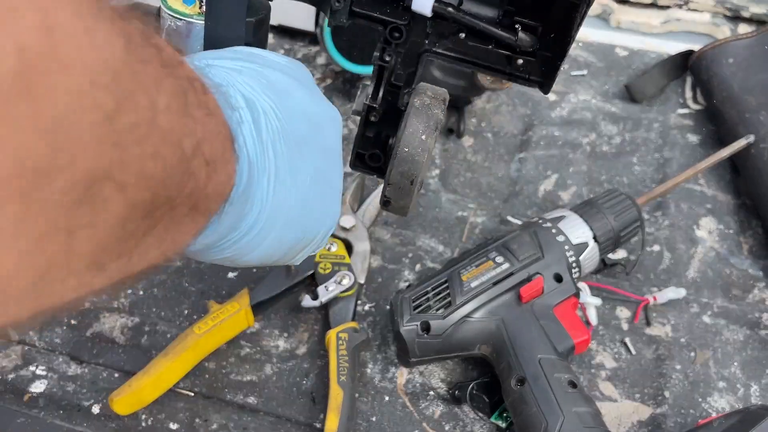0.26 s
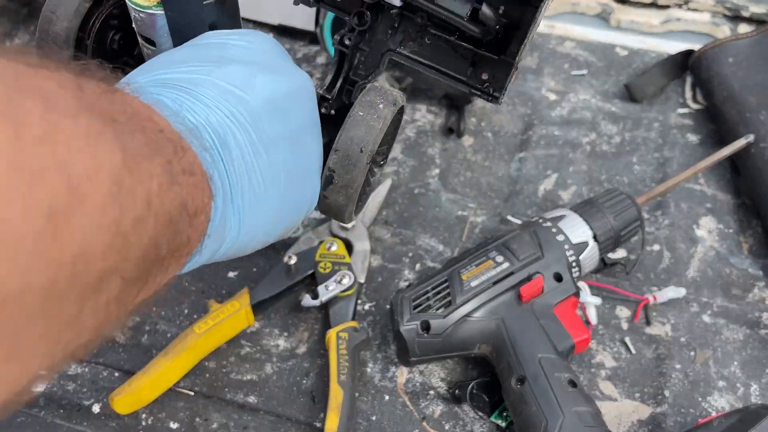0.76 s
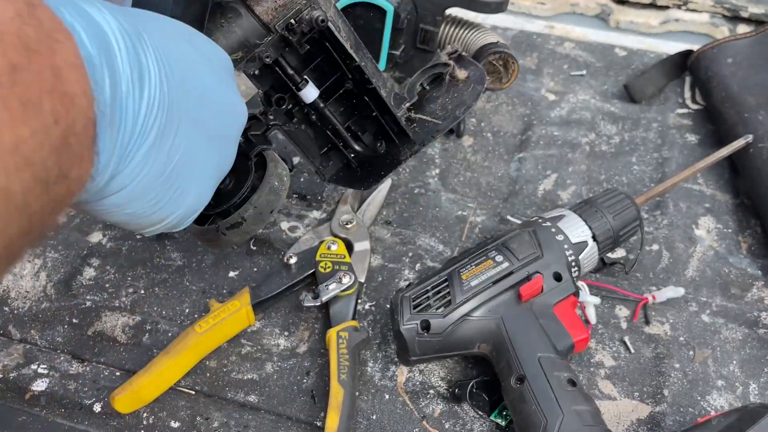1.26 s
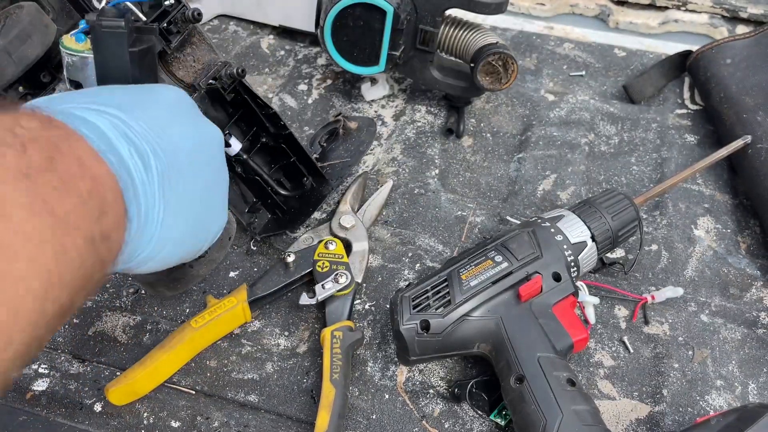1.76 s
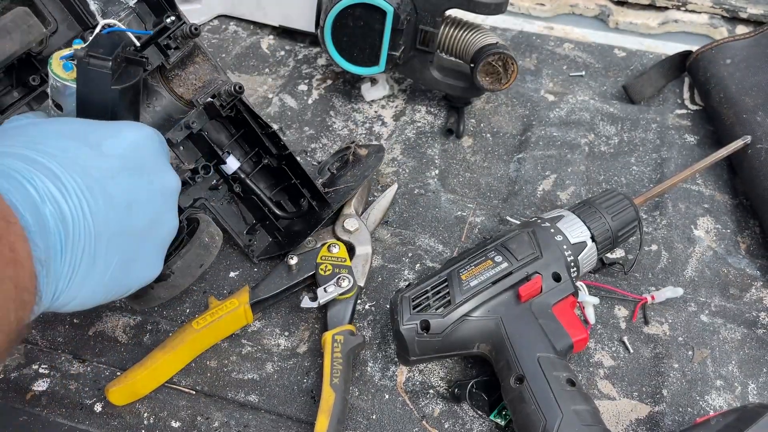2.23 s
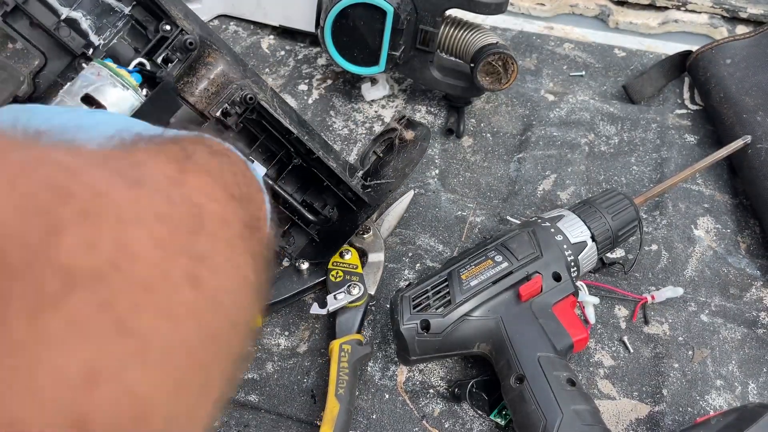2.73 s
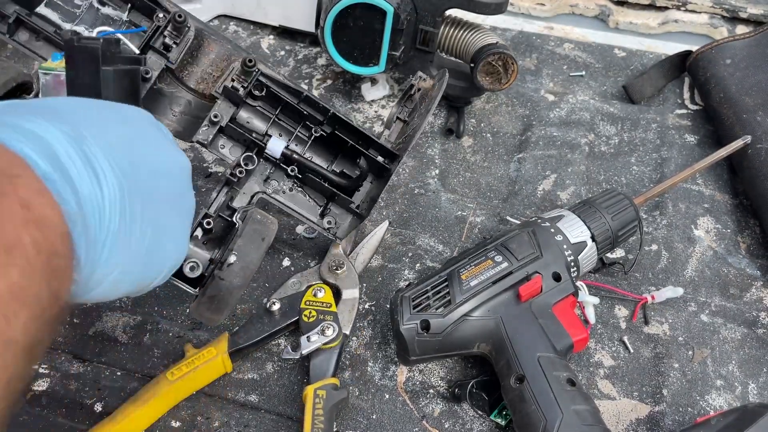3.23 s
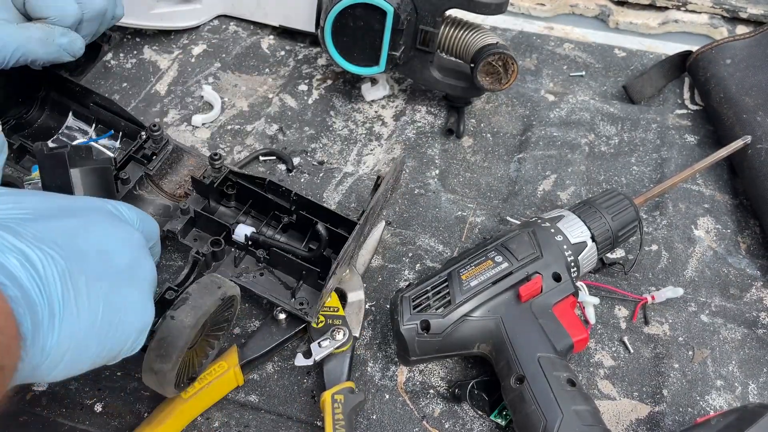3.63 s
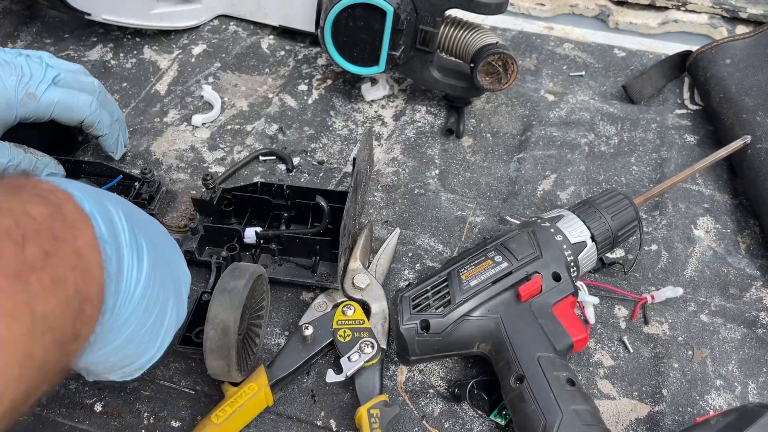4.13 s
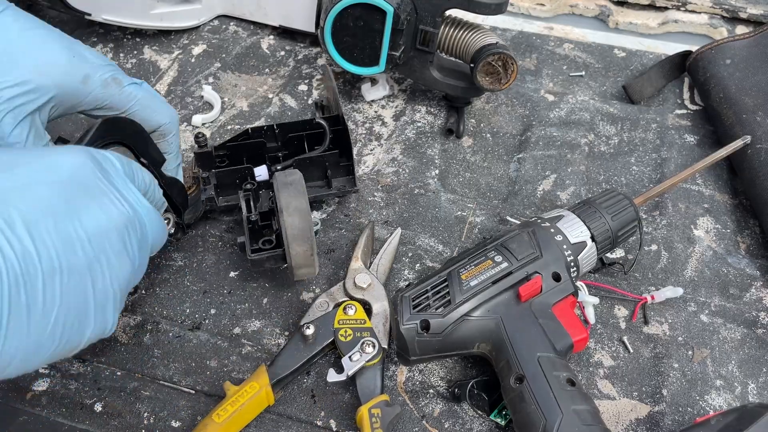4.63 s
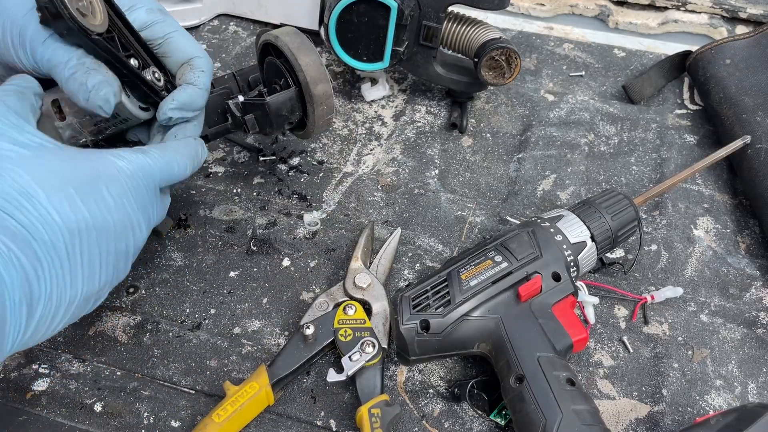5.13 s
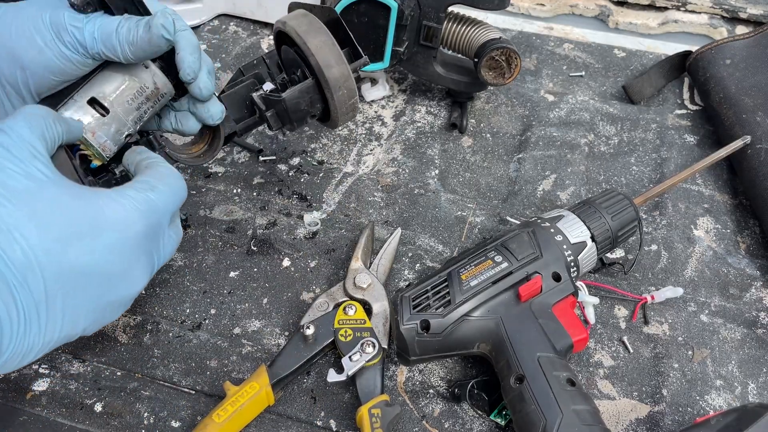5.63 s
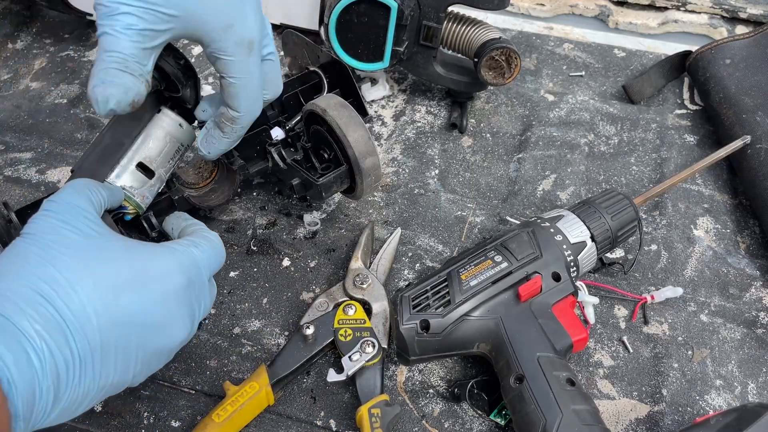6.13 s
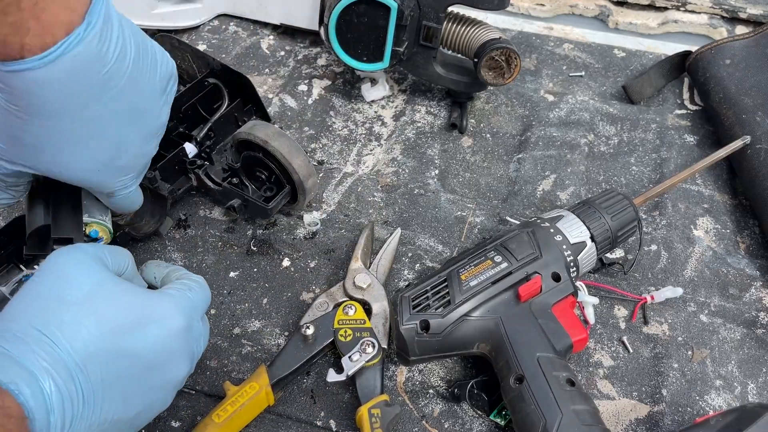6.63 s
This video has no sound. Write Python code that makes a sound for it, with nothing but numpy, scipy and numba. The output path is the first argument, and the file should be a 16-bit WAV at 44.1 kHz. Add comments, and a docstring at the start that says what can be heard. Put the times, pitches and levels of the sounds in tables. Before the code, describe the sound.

Close stereo, small garage with short, faint reflections; a low, wavering machine hum and dull rumble run throughout. Soft rubber-glove hiss with gritty ticks starts at once. At 0.2-0.27 s a tight burst of bright plastic cracks rings the hollow shell briefly, followed by weak snaps near 0.46 s and sparse clicks. From 1.1 s cracks mix with blunt bench bumps; a very bright snap lands at 1.7 s with a short groaning scrape. After a quieter gap, cracks return at 2.4-2.7 s, heavy low thuds and a drag hit near 2.8 s, and a dense cracking cluster peaks around 3.05 s. Loose pieces tick until 3.3 s. Softer knocks and scrapes follow, with small hollow creaks at 4.6 and 5.4 s. Thin clicks and a bright crack come around 5.7 s, a duller one at 5.87 s. From 6.3 s scrapes crowd in, with loud sharp snaps at 6.5 s, then fading knocks and drags.

```python
"""Gloved hands pry apart the hard plastic housing of a small appliance, close to the microphones, over a low hum.
Gloves hiss from the start as shaped noise with grit ticks; an early run of cracks rings the shell's decaying modes.
From about 1.1 s more cracks come with blunt bumps and drags on the bench, low-mode blows and stick-slip trains.
Loose pieces tap mostly just past 3 s, sliding sines creak from 4.6 s, and cracks and drags crowd in after 6.3 s.
Short noise echoes answer as a small garage; sine lines and rumble make the machine hum throughout."""
import sys
import numpy as np
from scipy import signal
from scipy.fft import rfft, irfft, next_fast_len
from scipy.io import wavfile
from scipy.ndimage import uniform_filter1d
from numba import njit

SR = 44100
rng = np.random.default_rng(int(sys.argv[2]) if len(sys.argv) > 2 else 0)


def master(y):
    """Save y as 16-bit WAV."""
    cut = np.clip(np.atleast_2d(y).T, -1, 1)
    pcm = np.round(cut * 32767)  # scale
    wavfile.write(sys.argv[1], SR, pcm.astype(np.int16))


N = 303055
TIME = np.arange(N) / SR
SIZE = next_fast_len(N, True)
FREQS = np.arange(SIZE // 2 + 1) * SR / SIZE + 1  # 1 Hz up, so that the log of the lowest bin exists

# cracks of ribs and catches: start_s, level_db, treble_db, part_hz (resonance of the part),
# rebounds (rounded to a whole count)
CRACKS = [(0.194, -6.5, -4.5, 3100, 0), (0.2034, -9, -33.5, 2880, 1), (0.2142, -9.5, -20.5, 1630, 2),
          (0.247, -11.5, -19, 3200, 0), (0.268, -4.5, -12.5, 4350, -0.5), (0.4571, -28.5, -60, 2120, 0),
          (0.476, -23, -36, 2140, 0), (1.1193, -6, -18, 3100, 2.6), (1.1435, -17, -34, 3180, 2.5),
          (1.3558, -14.5, -15.5, 3060, 0), (1.4262, -21, -7, 940, 0.5), (1.71, -5.5, -3.5, 8550, 0.062),
          (1.7704, -16.5, -26, 2000, 0.13), (1.8021, -18.5, -26, 2960, 2.2), (1.845, -23, -17, 3078, 0.35),
          (1.9012, -17.5, -29.5, 1040, 0), (2.4373, -23.5, -22, 3100, 0), (2.489, -27, -7, 2120, 2.4),
          (2.5198, -4.5, -13.5, 1560, 0), (2.6131, -28, -20, 960, 1.2), (2.724, -13.5, -17.5, 910, 3.1),
          (2.9379, -10, -18, 2502, 0), (2.9943, -15, -22.5, 990, 1.3), (3.057, -6.5, -17.5, 1550, 1),
          (3.074, -9, -20, 3000, 0.17), (3.0803, -5, -13.5, 2830, 0), (3.0856, -6, -14.5, 3180, 2),
          (3.4296, -11.5, -20.5, 960.7, 0), (3.4644, -17.5, -19.5, 1710, 0), (3.8182, -22, -33.5, 1223, 0),
          (4.5946, -20.5, -41, 1171, 3.8), (4.846, -17.5, -13.5, 1130, 2), (4.987, -25, -58, 1089, 1),
          (5.41, -28, -9, 1220, 0), (5.6967, -18.5, 4, 2700, 0), (5.8686, -10.5, -24, 1390, 0),
          (6.361, -27.5, -51, 1100, 0), (6.442, -22, -17, 3000, 0.5), (6.4723, -16, -15, 1082, 0.5),
          (6.488, -5.5, -8.5, 4900, -0.5), (6.504, -8, -11.5, 4570, 0.4), (6.5605, -22, -20, 1900, 1.35),
          (6.6439, -25.5, -46, 2140, 3)]
# a freed edge springs back and strikes again, ever later, weaker and duller than the first crack
REBOUND_S, REBOUND_GROWTH, REBOUND_DB, REBOUND_FADE_DB_PER_S, REBOUND_DULL_DB = .008, 1.6, -4.5, 276.5, -4.5
# bigger parts ring lower and shake more of the shell: body at 1 kHz, and its change with pitch
BODY_DB, BODY_DB_PER_OCTAVE = 2, -4.5
# spectrum of a crack before its own tilt and resonance: freq_hz, level_db_per_hz
CRACK_COLOUR = [(60, -9), (200, 3), (700, 1), (1500, -1), (3000, -4), (4600, -1), (6200, -6), (8700, -6.5),
                (10300, -21), (11800, -14), (16000, -49.5)]
# main modes of the housing as it lies on the bench: mode_hz, level_db (over the small modes), t60_s
HOUSING_MODES = [(132, 6, 0.13), (198.1, 8, 0.2), (343, -8.5, 0.51), (438.7, -0.5, 0.16),
                 (519.4, 8.5, 0.091), (630, 1.5, 0.1), (800, -3, 0.14), (1110, 1, 0.13), (1422, 4.5, 0.05),
                 (3005, -4, 0.14), (4310, -3.5, 0.057), (4880, -16.5, 0.075)]

# thin, bright clicks of small clips: start_s, level_db (before trim)
CLIP_CLICKS = [(0.052, -25), (0.573, -28.5), (0.771, -38.5), (0.8106, -34), (1.112, -26), (3.5875, -28),
               (4.718, -32.5), (5.511, -27.5), (5.6485, -24), (5.6633, -24), (5.739, -21.5), (5.772, -33),
               (5.805, -24), (6.2628, -36), (6.455, -25.5), (6.583, -33), (6.8538, -30)]
CLICK_HZ, CLICK_TREBLE_DB = 8670, -6

# bumps of the housing on the bench: start_s, level_db (before trim), peak_hz (loudest resonance),
# hardness_db (of the contact), rocking_s (time it goes on rocking)
BENCH_BUMPS = [(1.118, -8.5, 653, 8, 0), (1.363, -8, 139, -42, 0), (1.383, -11.5, 257, -5, 0.0011),
               (1.4257, -13.5, 452, -8, 0), (1.452, -27, 156, -34, 0.0011), (1.769, -14.5, 240, -13, 0.058),
               (1.901, -24, 230, -23, 0.0054), (2.796, -5.5, 190, -13.5, 0), (2.812, -6, 140.1, -12.5, 0),
               (2.883, -15, 133, -49, 0.14), (3.431, -18, 240, 4, 0.0078), (3.821, -17, 198.3, -27, 0),
               (3.862, -21.5, 230, -13, 0.002), (4.053, -15.5, 204, -12, 0), (4.46, -17, 342, -8, 0.0089),
               (4.569, -18.5, 217.1, -7.5, 0.021), (4.988, -18.5, 500, -10.5, 0.00075),
               (5.249, -28, 263, -2, 0.0094), (5.869, -15.5, 345.8, -9, 0.0093),
               (5.882, -17, 868.5, -10, 0), (6.399, -21, 398, -10, 0.00029), (6.421, -17, 390.2, -9, 0.038),
               (6.703, -19, 710, 4.5, 0), (6.717, -24, 304, -1.5, 0)]
ROCK_GAP_S, ROCK_LOSS_DB = .048, -1  # longest gap between rocking knocks; change from knock to knock
# band that a blunt contact excites: multiple of peak_hz, level_db_per_hz
THUD_BAND = [(.3, -18), (.6, -2), (1, 5), (2.2, -7), (4, -18.5), (12, -61)]
# sharp part of a bump before hardness is added: freq_hz, level_db_per_hz
CLACK = [(100, -44.5), (1200, -6.5), (4000, -15.0), (9000, -13.5), (16000, -52.5)]

# housing drags over the bench: start_s, length_s, groan_db, groan_hz, rasp_db, rasp_hz,
# pressure_change_db (start to end); both levels are before trim
DRAGS = [(1.627, .05, -35, 202.3, -52, 2017, -2.5), (1.72, 0.15, -24.5, 323, -37, 2765, -4.5),
         (2.691, 0.03, -42, 537, -36.5, 1725, 25), (2.783, 0.047, -21.5, 445, -44.5, 1999, -10),
         (2.883, 0.04, -26.5, 460, -58.5, 1702, -21), (3.462, 0.095, -38, 450.3, -75, 1712, -22),
         (3.955, 0.071, -36.5, 520, -48, 1500, -2), (4.08, 0.11, -46, 330, -63.5, 1520, 4),
         (4.485, 0.21, -36.5, 376.2, -43.5, 1600, 4.5), (4.678, 0.12, -40, 476, -48, 1810, -7),
         (5.017, .125, -36, 500, -47.5, 1190, -7), (5.137, 0.23, -43, 350.8, -63, 980, -2),
         (6.317, .08, -33.5, 330, -52, 1299, 12), (6.402, 0.082, -25, 445, -32, 1030, 3),
         (6.487, 0.044, -32, 335, -34, 1600, -1), (6.566, 0.066, -51, 400, -38.5, 1920, -16),
         (6.65, 0.06, -47, 402.5, -40.5, 2000, 12), (6.721, 0.13, -42.5, 350, -54, 1517, -12)]
# band that a drag excites: multiple of its resonance (widened for the rasp), level_db_per_hz
SCRAPE_BAND = [(.08, -26.5), (.45, -4), (1, 1), (1.6, -8.5), (3, -30.5), (12, -37)]

# hollow creaks of the shell under the fingers: start_s, length_s, level_db, start_hz, end_hz
SHELL_CREAKS = [(4.603, 0.097, -35, 340.6, 306), (4.689, 0.082, -39.5, 478, 552),
                (5.437, 0.11, -43, 392, 405)]

# moves of the gloves over the shell: start_s, length_s, level_db (mid-move)
GLOVE_MOVES = [(0, 0.57, -67.5), (1.07, 0.14, -47.5), (1.266, 0.14, -50), (1.42, 0.41, -51.5),
               (2.108, 0.51, -60), (2.897, 0.3, -61), (3.27, 0.47, -58), (3.797, 0.09, -53),
               (4.024, 0.13, -50), (4.19, 0.26, -59), (4.414, 0.23, -51.5), (4.638, 0.31, -48.5),
               (5.035, 0.093, -52), (5.177, 0.15, -54), (5.401, 0.15, -54), (5.636, 0.37, -53),
               (6.2, 0.52, -56)]
MOVE_ENDS_DB, GRIP_DB = -6, -72.5  # how much fainter a move is at its ends; rustle of a still grip
# hiss of glove on shell: freq_hz, level_db_per_hz
GLOVE_COLOUR = [(800, -3), (2500, -9), (4800, -7.5), (8800, -2), (10300, -18), (11500, -14.5),
                (14000, -41.5)]

# loose pieces tapping the shell: start_s, level_db
LOOSE_TAPS = [(0.337, -40), (0.535, -44.5), (1.509, -40), (1.532, -32.5), (2.2251, -38), (2.679, -35.5),
              (3.1348, -20), (3.1738, -31.5), (3.189, -36.5), (3.204, -38), (3.2207, -27.5),
              (3.2639, -32.5), (3.279, -40), (3.305, -38), (3.926, -43), (4.439, -32), (6.829, -41)]

# machine hum lines, before waver and swell: line_hz, level_db
HUM_LINES = [(60.5, -50), (109.5, -45.5), (138.7, -52.5), (165.2, -59.5), (219.2, -56.5), (348.2, -68)]
# dull rumble under the lines: freq_hz, level_db_per_hz
RUMBLE_COLOUR = [(20, -42.5), (35, -26), (52, 2), (80, 1.5), (100, -6), (135, -10), (180, -13.5),
                 (300, -21.5), (700, -38.5), (2000, -50.5), (9000, -60), (14000, -79.5)]
# the hum swells and sinks: time_s, gain_db
HUM_GAIN = [(0, 1), (3.2, 3), (3.7, 0.5), (4.8, 1.5), (5.7, -1), (6.87, 1)]

# stereo image before the bass is narrowed: freq_hz, left_minus_right_db, side_minus_mid_db
STEREO_IMAGE = [(170, 0.5, 1.5), (380, 3.5, -7.5), (800, 2.5, -6.5), (2530, 6, -3), (4280, 3, -15),
                (9000, 1, -10.5)]
TOP_HZ = 16400


def undb(db):
    """Decibels to gain."""
    return 10 ** (np.asarray(db) / 20)


def along(points, hz, axis=1):
    """Read one column of a table on a log-frequency axis."""
    points = np.array(points, float)
    return np.interp(np.log(hz), np.log(points[:, 0]), points[:, axis])


def ears(mid, side, hz):
    """Left and right shares: the image leans left and its width varies with frequency."""
    lean_db = along(STEREO_IMAGE, hz)
    width = undb(along(STEREO_IMAGE, hz, axis=2))
    left = (mid + width * side) * undb(lean_db / 2)
    right = (mid - width * side) * undb(-lean_db / 2)
    return np.array([left, right])


def coloured(pair, points):
    """Shape a mid and a side signal to a spectrum; stereo out, its mono sum at rms 1."""
    shaped = ears(*rfft(pair, SIZE), FREQS) * undb(along(points, FREQS))
    out = irfft(shaped, SIZE)[:, :N]
    return out / out.mean(axis=0).std()


def walk(rate_hz):
    """Smoothed random steps at a given rate, with a spread near 1."""
    hold = int(SR / rate_hz)
    steps = np.repeat(rng.standard_normal(N // hold + 1), hold)
    return np.sqrt(2) * uniform_filter1d(steps, hold)[:N]


def add(out, start_s, sound):
    """Mix a sound in at a time."""
    i = max(int(start_s * SR), 0)
    out[:, i:i + sound.shape[1]] += sound[:, :N - i]


@njit
def ring(poles, swell, gains, size):
    """Sum of decaying modes, each swelling at its own pace and reaching each side with its own gain."""
    out = np.zeros((2, size))
    for k in range(len(poles)):
        z, rest = 1 + 0j, 1.
        for i in range(size):
            out[0, i] += (gains[0, k] * z).imag * (1 - rest)
            out[1, i] += (gains[1, k] * z).imag * (1 - rest)
            z *= poles[k]
            rest = rest * swell[k] + 1e-18
            if z.real ** 2 + z.imag ** 2 < 1e-8:  # 80 dB down
                break
    return out


def blow(colour, t60, damping, rise_s, main_db, scatter, count=220):
    """One blow rings the main modes and a crowd of small ones, redrawn each time; t60 is at 1 kHz."""
    shift, damp, mid, side = rng.random((4, count + len(HOUSING_MODES)))
    main_hz, main_level_db, main_t60 = np.transpose(HOUSING_MODES)
    root = np.linspace(np.sqrt(60), np.sqrt(16000), count)
    crowd_hz = (root + (shift[:count] - .5) * (root[1] - root[0])) ** 2
    hz = np.append(crowd_hz, main_hz * (1 + 0.044 * (shift[count:] - .5)))

    # higher modes die sooner, and each is damped differently by the hands
    crowd_t60 = t60 * (crowd_hz / 1000) ** -damping * np.exp(scatter * (2 * damp[:count] - 1))
    life = np.maximum(np.append(crowd_t60, main_t60), .002)

    # modes thin out with pitch, so each carries more to keep the colour per Hz
    boost_db = np.append(np.zeros(count), main_level_db + main_db)
    size = undb(colour(hz) + boost_db) * hz ** (1 / 4)
    size = size / np.sqrt(np.sum(size ** 2))
    gains = size * ears(np.exp(2j * np.pi * mid), np.exp(2j * np.pi * side), hz)
    poles = np.exp((2j * np.pi * hz - np.log(1000) / life) / SR)
    swell = np.exp(-1 / (SR * (rise_s + 0.18 / hz)))
    return ring(poles, swell, gains, SR // 3)


def snap(db, treble_db, part_hz, top_db=-3, treble_ref_db=-16, focus_db=8, focus_octaves=0.15):
    """A catch lets go within a millisecond; the part that it sits on is brought out at its resonance."""
    body_db = BODY_DB + BODY_DB_PER_OCTAVE * np.log2(part_hz / 1000)
    bright_db = treble_db - treble_ref_db
    tilt = [(800, body_db), (1500, 0.025), (3600, 0.0083), (7500, bright_db), (13000, bright_db + top_db)]

    def colour(hz):
        focus = np.exp(-(np.log2(hz / part_hz) / focus_octaves) ** 2)
        return along(CRACK_COLOUR, hz) + along(tilt, hz) + focus_db * focus

    return undb(db) * blow(colour, t60=0.029, damping=0.43, rise_s=0.00029, main_db=-11.0, scatter=0.097)


def snaps(run_s=0.0027, run_db=-7):
    """The plastic cracks, the crack runs on for a few milliseconds, and the freed edge chatters."""
    out = np.zeros((2, N))
    for start_s, db, treble_db, part_hz, rebounds in CRACKS:
        add(out, start_s, snap(db, treble_db, part_hz))
        add(out, start_s + run_s, snap(db + run_db, treble_db, part_hz))
        gaps_s = REBOUND_S * REBOUND_GROWTH ** np.arange(round(rebounds))
        for late_s in np.cumsum(gaps_s):
            weaker_db = REBOUND_DB - REBOUND_FADE_DB_PER_S * late_s
            rebound = snap(db + weaker_db, treble_db + REBOUND_DULL_DB, part_hz)
            add(out, start_s + late_s * rng.uniform(.9, 1.1), rebound)
    return out


def clicks(trim_db=1):
    """Small clips flick free, all with the same thin, bright tuning."""
    out = np.zeros((2, N))
    for start_s, db in CLIP_CLICKS:
        add(out, start_s, snap(db + trim_db, CLICK_TREBLE_DB, CLICK_HZ, top_db=2.5))
    return out


def bumps(trim_db=-1, clack_db=-4, push_s=0.0006, choke=.9):
    """Blunt contacts push slowly into low modes; harder ones start faster, can die sooner and clack more."""
    out = np.zeros((2, N))
    for start_s, db, peak_hz, hardness_db, rocking_s in BENCH_BUMPS:
        def colour(hz):
            return np.maximum(along(THUD_BAND, hz / peak_hz), along(CLACK, hz) + hardness_db + clack_db)

        t60 = 0.086 * undb(-choke * max(hardness_db, 0))
        rise_s = push_s * undb(-hardness_db / 2)
        knocks = 1 + int(np.ceil(rocking_s / ROCK_GAP_S))
        for k, late_s in enumerate(np.linspace(0, rocking_s, knocks)):
            thud = blow(colour, t60, damping=0.63, rise_s=rise_s, main_db=2.0, scatter=0.72)
            add(out, start_s + late_s, undb(db + trim_db + k * ROCK_LOSS_DB) * thud)
    return out


def strokes(trim_db=-1, groan_slips_hz=190, rasp_slips_hz=130, uneven_db=6.0, rasp_t60=0.039,
            rasp_focus=0.48, hiss_share=.025):
    """Stick and slip under changing pressure: uneven slips make the housing groan and its edge rasp."""
    out = np.zeros((2, N))
    for start_s, length_s, groan_db, groan_hz, rasp_db, rasp_hz, change_db in DRAGS:
        u = np.linspace(0, 1, max(int(length_s * SR), 2))
        pressure = undb(change_db * u)
        groan = blow(lambda hz: along(SCRAPE_BAND, hz / groan_hz),
                     t60=0.03, damping=0.87, rise_s=0.00048, main_db=-8.0, scatter=0.13)
        rasp = blow(lambda hz: along(SCRAPE_BAND, (hz / rasp_hz) ** rasp_focus),
                    t60=rasp_t60, damping=0.65, rise_s=0.00087, main_db=-9.5, scatter=0.41)
        for body, db, rate_hz in (groan, groan_db, groan_slips_hz), (rasp, rasp_db, rasp_slips_hz):
            chance = rng.random(SR)[:len(u)]
            spread, hiss = rng.standard_normal((2, SR))[:, :len(u)]
            slips = (chance < rate_hz / SR) * undb(uneven_db * np.clip(spread, -2, 1))
            drive = (slips + hiss_share * hiss) * pressure
            sound = signal.fftconvolve(drive[None], body, axes=1)
            level = np.sqrt(2 * len(u) / np.sum(sound ** 2))  # rms 1 over the stroke
            add(out, start_s, undb(db + trim_db) * sound * level)
    return out


def creaks(waver=0.054, rough_db=4):
    """Slips lock onto one resonance of the hollow shell, which slides as the grip tightens or loosens."""
    out = np.zeros((2, N))
    wobble, rough = 1 + waver * walk(130), undb(rough_db * walk(90))
    for start_s, length_s, db, start_hz, end_hz in SHELL_CREAKS:
        u = np.linspace(0, 1, max(int(length_s * SR), 2))
        now = int(start_s * SR) + np.arange(len(u))
        pitch_hz = (start_hz + (end_hz - start_hz) * u) * wobble[now]
        phase = 2 * np.pi * np.cumsum(pitch_hz) / SR
        arch = 2 * np.sqrt(u * (1 - u))
        creak = np.outer(ears(0.93, 0, start_hz), np.sin(phase) * rough[now] * arch)
        add(out, start_s, undb(db) * creak)
    return out


def friction(points, grain_db, swell_db, flutter_db=2.5):
    """Dense tiny slips of uneven size; the pressure of the fingers comes and goes."""
    uneven_db = grain_db * walk(830) + flutter_db * np.clip(walk(110), -2, 2)
    drive = rng.standard_normal((2, N)) * undb(uneven_db)
    return coloured(drive, points) * undb(swell_db * walk(22))


def gloves(grit_db=15, grit_spread_db=4, grit_treble_db=-13, grit_hz=2200, count=60):
    """Thin rubber brushing the shell gives a fine hiss, and grit ticks under it as hard as the fingers press."""
    rub_db = np.full(N, float(GRIP_DB))
    for start_s, length_s, db in GLOVE_MOVES:
        arch = np.abs(2 * (TIME - start_s) / length_s - 1) ** 3  # 0 mid-move, 1 at its ends
        rub_db = np.maximum(rub_db, db + MOVE_ENDS_DB * arch)
    out = undb(rub_db) * friction(GLOVE_COLOUR, grain_db=2.0, swell_db=2.5)
    for when, size in rng.random((count, 2)):
        i = int(when * N)
        tick_db = rub_db[i] + grit_db + grit_spread_db * (2 * size - 1)
        add(out, TIME[i], snap(tick_db, grit_treble_db, grit_hz))
    return out


def ticks(loose_hz=2900, treble_db=-32):
    """Loose pieces tap the shell lightly, each a short dry tick."""
    out = np.zeros((2, N))
    for start_s, db in LOOSE_TAPS:
        add(out, start_s, snap(db, treble_db, loose_hz, focus_db=2.5))
    return out


def garage(x, echo_s=0.012, echo_db=-17, early_db=-12, early_t60=0.074, late_db=-23, late_t60=0.26):
    """A near surface throws a smeared echo, clutter scatters the sound, and a faint duller tail follows."""
    t = TIME[:SR // 2]
    # start_s, t60_s, level_db (before the dullness trim), treble_db
    layers = [(echo_s, .015, echo_db, -1), (.004, early_t60, early_db, -5), (.015, late_t60, late_db, -7)]
    response = 0
    for start_s, t60, db, top_db in layers:
        noise = coloured(rng.standard_normal((2, N)), [(4000, 0.014), (9000, top_db)])[:, :len(t)]
        decay = np.exp(-np.log(1000) * np.maximum(t - start_s, 0) / t60)
        part = noise * (t >= start_s) * decay
        part = part / np.sqrt(np.sum(part ** 2, axis=1, keepdims=True))
        response = response + undb(db + top_db / 2) * part  # duller layers are softer
    return x + signal.fftconvolve(x, response, axes=1)[:, :N]


def hum(rumble_db=-43.0, waver_db=3.0, drift_rad=0.11):
    """A machine hums: low lines, wavering in level and drifting in phase, over a dull rumble."""
    lines = 0
    for hz, db in HUM_LINES:
        level = undb(db + waver_db * walk(1.8))
        lines = lines + level * np.sin(2 * np.pi * hz * TIME + drift_rad * walk(2.7))
    rumble = undb(rumble_db) * coloured(rng.standard_normal((2, N)), RUMBLE_COLOUR)
    return (lines + rumble) * undb(np.interp(TIME, *np.transpose(HUM_GAIN)))


def scene():
    """The work on the bench, answered by the garage, over the machine hum."""
    work = snaps() + clicks() + bumps() + strokes() + creaks() + gloves() + ticks()
    return garage(work) + hum()


def record(dry, ceiling=1.5, apart_hz=260, low_cut_hz=42):
    """Two close microphones share the bass, the right one sample late; both extremes cut, peaks rounded."""
    apart = FREQS ** 4 / (FREQS ** 4 + apart_hz ** 4)  # takes the bass out of the side signal
    side = irfft(rfft(dry[0] - dry[1], SIZE) / 2 * apart, SIZE)[:N]
    mid = dry.mean(axis=0)
    pair = np.array([mid + side, np.roll(mid - side, 1)])
    low_cut = signal.butter(4, low_cut_hz, "highpass", fs=SR, output="sos")
    pair = signal.sosfilt(low_cut, pair)
    rounded = ceiling * np.tanh(pair / ceiling)
    top_cut = signal.ellip(8, .2, 70, TOP_HZ, fs=SR, output="sos")
    return signal.sosfilt(top_cut, rounded)


dry = scene()
out = record(dry)
master(out)
```